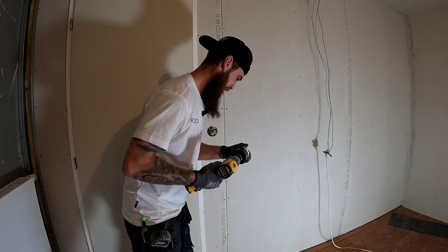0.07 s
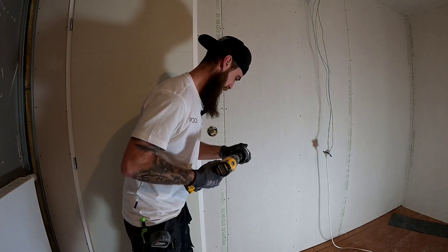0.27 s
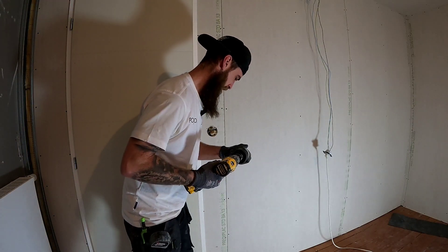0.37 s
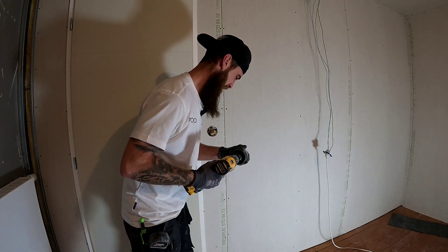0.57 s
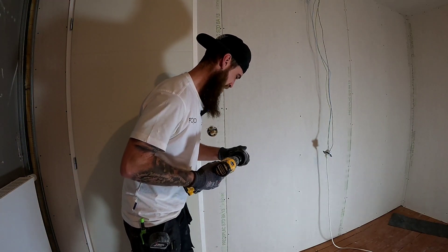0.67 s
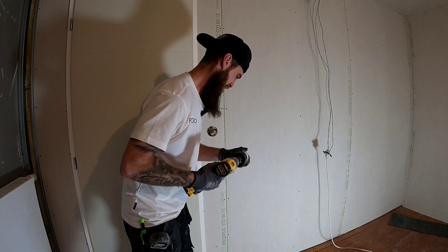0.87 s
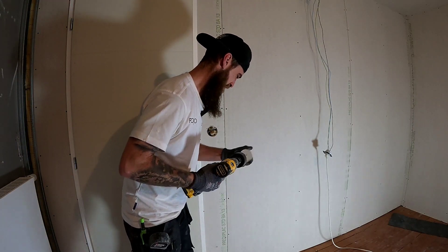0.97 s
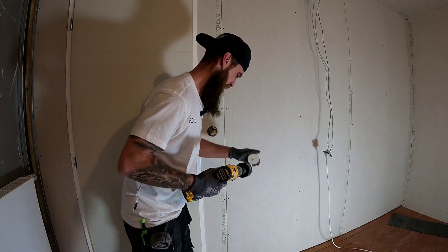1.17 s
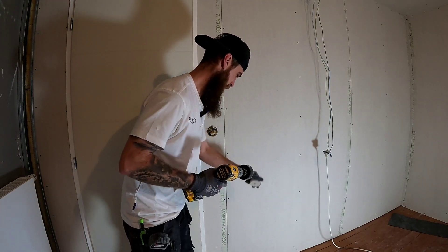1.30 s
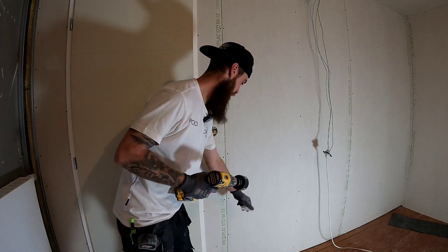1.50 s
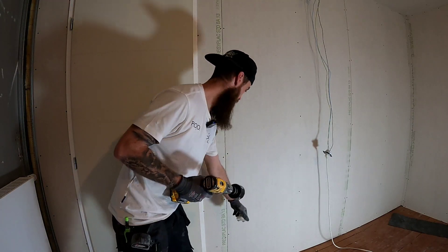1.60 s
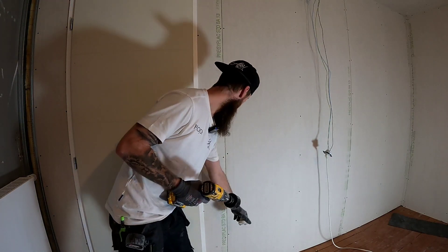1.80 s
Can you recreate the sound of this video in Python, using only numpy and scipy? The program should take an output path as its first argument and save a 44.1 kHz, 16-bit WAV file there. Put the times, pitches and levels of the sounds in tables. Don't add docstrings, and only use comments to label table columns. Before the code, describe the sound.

A cordless drill whines in one short burst, brakes with a clack, then a plaster plug drops.

```python
import sys
import numpy as np
from scipy import signal
from scipy.io import wavfile
from scipy.ndimage import uniform_filter1d

SR = 44100
rng = np.random.default_rng(int(sys.argv[2]) if len(sys.argv) > 2 else 0)


def attenuation_scalar(level_db):
    decades = np.asarray(level_db, float) / 20
    return 10 ** decades


def persist_wave(psi):
    counts = np.round(np.clip(psi, -1, 1) * 32767).astype(np.int16)
    wavfile.write(sys.argv[1], SR, np.atleast_2d(counts).T)


N = 81585
T = np.arange(N) / SR

# f/Hz, level/dB per Hz
EARLIER_SPECTRUM = [(35, -71), (60, -30), (212, -2.5), (371, -15), (458, 2), (991, 0.5), (3420, -1.5),
                    (6900, -4.5), (16000, -40)]
# f/Hz, level/dB per Hz
QUIET_SPECTRUM = [(30, -12), (100, 28.5), (500, -4), (1200, 28), (2500, -84.5), (6000, 6), (16000, -5)]
# t/s, level/dB, f/Hz, ring/ms
DRILL_CLICKS = [
    (.095, -33, 1200, 2),
    (.0955, -42, 11000, .6),
    (.176, -39, 9500, 1),
    (.19, -35, 5000, 2),
    (.2435, -17, 3000, 3),
    (.2445, -25, 9000, 1.5),
    (1.2825, -16, 2500, 1.5),
    (1.2855, -9.5, 3400, 2),
    (1.287, -17, 600, 6),
    (1.718, -51, 6500, 2),
]
# t/s, level/dB, f/Hz, ring/ms
DRILL_THUMPS = [
    (.18, -40, 200, 15),
    (.213, -30, 400, 6),
    (.241, -26, 300, 8),
    (.243, -26, 170, 14),
    (.265, -42, 105, 50),
    (.36, -37, 90, 10),
    (1.28, -36, 130, 12),
    (1.43, -46, 90, 10),
]
# t/s, speed/turns per s
SHAFT_SPEED = [(.172, 40), (.243, 90), (.27, 165), (.30, 217), (.33, 282), (.35, 318), (.38, 355),
               (.418, 419), (.47, 407.5), (.56, 405.3), (1.215, 406), (1.235, 390), (1.25, 364),
               (1.27, 295), (1.286, 215)]
# t/s, level/dB
MOTOR_EFFORT = [(.168, -26), (.18, -12.5), (.2, -17), (.238, -12.5), (.246, -4.5), (.27, -2.5), (.33, 1),
                (.42, 1), (.6, 0.5), (1.2, 0.5), (1.284, 1.5), (1.292, -10), (1.305, -3), (1.32, -40)]
# f/Hz, level/dB per Hz
CREEP_SPECTRUM = [(60, -30), (200, -16), (460, -12), (900, -8), (2000, -11), (3190, -3.5), (7570, -7),
                  (16000, -38)]
# f/Hz, level/dB per Hz
RATTLE_SPECTRUM = [(35, -78), (60, -57), (346, -19), (803, -6.5), (1140, -5.5), (1250, -5), (1440, -9),
                   (7400, -12.5), (16000, -30.5)]
# f/Hz, width/Hz, lift/dB
HOUSING_RESONANCES = [(1000, 500, -0.5), (1740, 450, 4.5), (3085, 1000, 6.5), (4340, 310, 3),
                      (5080, 530, 3), (7700, 1580, 6), (10100, 360, 6)]
WHINE_MULTIPLES = [1, 2, 3, 4, 7, 8, 10, 12, 16, 23]
# level/dB, lift at low speed/dB, lift while the speed changes/dB
WHINE_LEVELS = [(-42.5, -10, 0), (-33.5, -6, 0), (-26, -8, 3), (-39, 0, 0), (-41, -4, 0), (-29.5, -22, 6),
                (-36, 4, 4), (-45, 0, 0), (-49, 24, 4), (-36.5, 0, 5.5)]
# t/s, level/dB, f/Hz, ring/ms
PLUG_TICKS = [
    (1.6445, -32, 1800, 1),
    (1.645, -46, 10000, .5),
    (1.6515, -35, 8000, .6),
    (1.6518, -31, 1500, 1),
    (1.6602, -27, 5000, .5),
    (1.6662, -26, 5000, .6),
    (1.672, -34, 1200, 3),
]
# t/s, level/dB, f/Hz, ring/ms
PLUG_THUMPS = [
    (1.65995, -3, 1200, .8),
    (1.659, -17, 500, 2),
    (1.6615, -24, 1500, 2),
    (1.6635, -27, 330, 4),
    (1.6605, -32, 130, 6),
]
# f/Hz, level/dB, time to fade by 60 dB/s
CUP_TONES = [(2751, -50, 2), (4366, -58, 2)]
# f/Hz, time/s
ROOM_FADE = [(100, 0.28), (260, 1.55), (700, 1.02), (1840, 1.04), (4300, 0.79), (9000, 0.53), (14000, 0.44)]
# f/Hz, level/dB
ROOM_WIDTH = [(30, -8), (125, -15), (400, -15), (1200, -27), (2500, -26), (5000, -19), (9000, -13),
              (13000, -3)]


def evened(x):
    return x / np.sqrt(np.mean(x ** 2) + 1e-20)


def read(points, hz):
    f, value = np.transpose(points)
    return np.interp(np.log(hz + 1), np.log(f + 1), value)


def curve(points):
    return np.interp(T, *np.transpose(points))


def slow(hz):
    return evened(signal.lfilter(*signal.butter(2, hz, fs=SR), rng.standard_normal(N)))


def band(x, low_hz, high_hz):
    return signal.lfilter(*signal.butter(2, [low_hz, high_hz], "band", fs=SR), x)


def add(mix, s, sound):
    part = mix[round(s * SR):][:len(sound)]
    part += sound[:len(part)]


def shaped(x, field_db):
    hz, t, z = signal.stft(x, SR, nperseg=512, noverlap=384)
    z = z * attenuation_scalar(field_db(hz[:, None], t))
    return signal.istft(z, SR, nperseg=512, noverlap=384)[1][..., :x.shape[-1]]


def background():
    a, b = rng.standard_normal((2, 2, N))
    haste = 0.88
    earlier = shaped(a, lambda hz, t: read(EARLIER_SPECTRUM, hz) - 60 * t / (haste * read(ROOM_FADE, hz)))
    quiet = evened(shaped(b, lambda hz, t: read(QUIET_SPECTRUM, hz) + 0 * t))
    return attenuation_scalar(-34) * earlier / np.std(earlier[0, :1000]) + attenuation_scalar(-57) * quiet


def knocks(clicks, thumps):
    out, t = np.zeros(N), np.arange(4000) / SR
    for s, db, hz, ms in clicks:
        low_hz, high_hz = np.clip([hz * .6, hz * 1.5], 50, SR * .45)
        grit = evened(band(rng.standard_normal(len(t)), low_hz, high_hz))
        onset = np.minimum(t * hz, 1)
        add(out, s, attenuation_scalar(db) * grit * np.exp(-1000 * t / ms) * onset)
    for s, db, hz, ms in thumps:
        onset = np.minimum(1.5 * t * hz, 1) ** 2
        add(out, s, attenuation_scalar(db) * np.sin(2 * np.pi * hz * t) * np.exp(-1000 * t / ms) * onset)
    return out


def shaft():
    speed = curve(SHAFT_SPEED)
    turns = np.cumsum(speed * (1 + .0007 * slow(20))) / SR
    return speed, np.gradient(speed) * SR, turns


def gears(speed, change, turns):
    full = np.clip((speed - 90) / 200, 0, 1)
    pulse = 1 + .1 * np.cos(2 * np.pi * turns)
    chatter = attenuation_scalar(1.5 * slow(150))
    drive = rng.standard_normal(N) * pulse * chatter
    patches = uniform_filter1d(rng.standard_normal((257, N // 128 + 2)), size=5, axis=0)
    patches = 1.5 * evened(uniform_filter1d(patches, size=14, axis=1))

    def housing(hz):
        return sum(db / (1 + (2 * (hz - f) / width) ** 2) for f, width, db in HOUSING_RESONANCES)

    fast = evened(shaped(drive, lambda hz, t: read(RATTLE_SPECTRUM, hz) + housing(hz) + patches[:, :len(t)]))
    creep = evened(shaped(drive, lambda hz, t: read(CREEP_SPECTRUM, hz) + patches[:, :len(t)]))
    braking = uniform_filter1d(1. * (change < -600), size=400)
    return attenuation_scalar(-19.5 - 4 * braking) * (full * fast + (1 - full) * creep)


def chuck_rumble():
    rumble = evened(band(rng.standard_normal(N), 0.61 * 111, 1.82 * 111))
    return rumble * attenuation_scalar(-57.5 + 8 * slow(18))


def whine(speed, change, turns):
    mesh = np.cumsum(speed * .003 * slow(60)) / SR
    low = np.clip(2 * (1 - speed / speed.max()), 0, 1)
    strain = np.clip(abs(uniform_filter1d(change, size=400)) / 1200, 0, 1)
    tones = np.zeros(N)
    for multiple, (db, low_lift_db, strain_lift_db) in zip(WHINE_MULTIPLES, WHINE_LEVELS):
        level_db = db + low_lift_db * low + strain_lift_db * strain + 1.5 * slow(20)
        blur = mesh if multiple == WHINE_MULTIPLES[-1] else 0
        cycles = multiple * (turns + blur) + rng.random()
        tones += attenuation_scalar(level_db) * np.sqrt(2) * np.sin(2 * np.pi * cycles)
    return tones * np.clip(speed / 245, 0, 1) ** 4


def drill():
    speed, change, turns = shaft()
    running = (T > MOTOR_EFFORT[0][0]) * (T < MOTOR_EFFORT[-1][0])
    effort = attenuation_scalar(curve(MOTOR_EFFORT)) * running
    rattle = (gears(speed, change, turns) + chuck_rumble()) * effort
    return whine(speed, change, turns) * effort, rattle


def brake_squeal():
    start_hz, end_hz, length_s = 2800, 4350, .025
    u = np.arange(0, 1, 1 / (length_s * SR))
    hz = end_hz + (start_hz - end_hz) * np.exp(-3 * u)
    out = np.zeros(N)
    add(out, 1.283, attenuation_scalar(-20) * np.sin(np.pi * u) * np.sin(2 * np.pi * np.cumsum(hz) / SR))
    return out


def crumbling():
    out, t = np.zeros(N), np.arange(4000) / SR
    grains = attenuation_scalar(20 * uniform_filter1d(rng.standard_normal(len(t)), size=30))
    dust = band(rng.standard_normal(len(t)) * grains, 4940, 2 * 4940)
    swell = np.sin(np.pi * np.minimum(t / .058, 1))
    add(out, 1.632, attenuation_scalar(-43) * dust * swell)
    return out


def cup_ring():
    out = np.zeros(N)
    for hz, db, fade_s in CUP_TONES:
        add(out, 1.667, attenuation_scalar(db - 60 * T / fade_s) * np.sin(2 * np.pi * hz * T))
    return out


def room(x):
    build_up = np.clip(np.arange(SR) / SR / 0.036 - .3, 0, 1)
    tail = shaped(rng.standard_normal((2, SR)) * build_up, lambda hz, t: -60 * t / read(ROOM_FADE, hz))
    return signal.fftconvolve(x[None], tail / np.linalg.norm(tail[0]), axes=1)[:, :N]


def scene():
    tones, rattle = drill()
    squeal = brake_squeal()
    hits = knocks(DRILL_CLICKS, DRILL_THUMPS) + crumbling() + knocks(PLUG_TICKS, PLUG_THUMPS) + cup_ring()
    to_room = attenuation_scalar(-5) * rattle + attenuation_scalar(-17) * tones + attenuation_scalar(-4) * squeal + attenuation_scalar(-32) * hits
    mid, side = room(to_room) + background()
    mid = mid + tones + rattle + squeal + hits
    side = shaped(side, lambda hz, t: read(ROOM_WIDTH, hz) + 0 * t)
    return np.array([mid + side, mid - side])


def roll_off(x):
    return signal.sosfilt(signal.butter(12, 16400, fs=SR, output="sos"), x)


def record(dry):
    mix = signal.lfilter(*signal.butter(2, 40, "high", fs=SR), dry)
    return roll_off(mix)


dry = scene()
out = record(dry)
persist_wave(out)
```